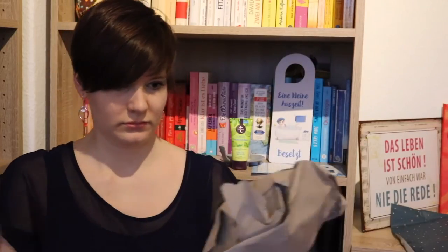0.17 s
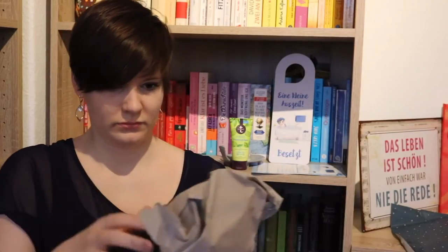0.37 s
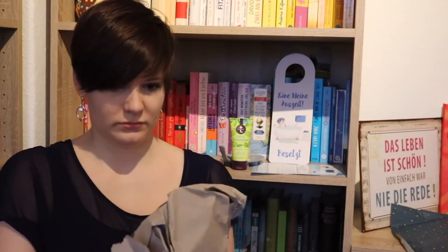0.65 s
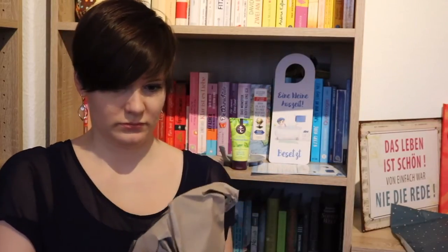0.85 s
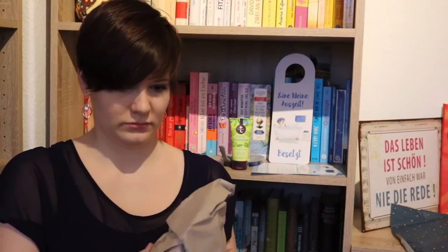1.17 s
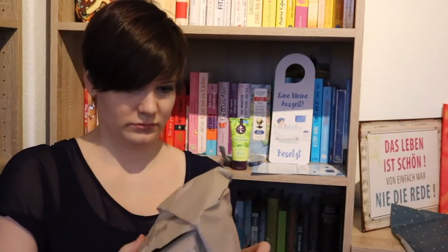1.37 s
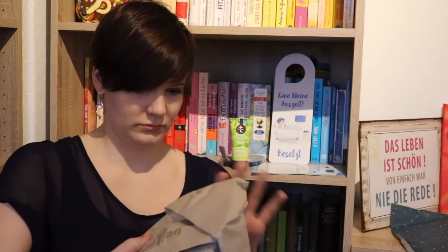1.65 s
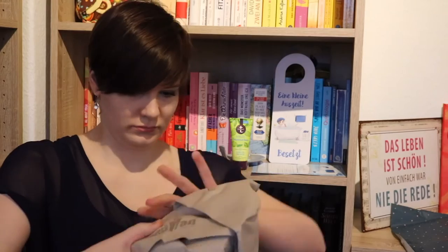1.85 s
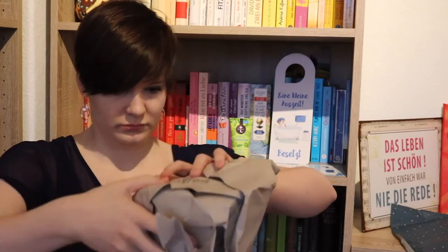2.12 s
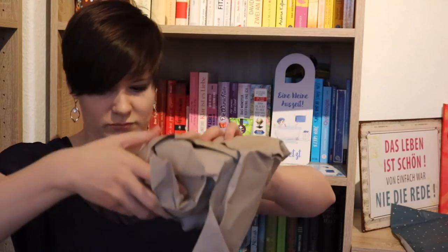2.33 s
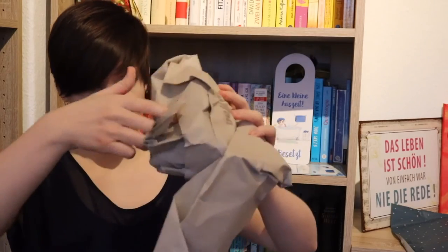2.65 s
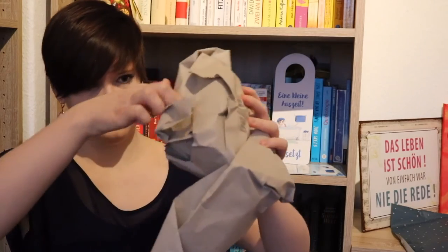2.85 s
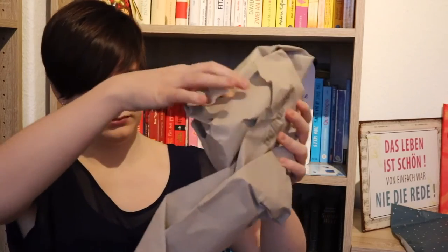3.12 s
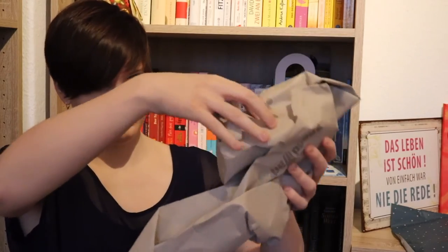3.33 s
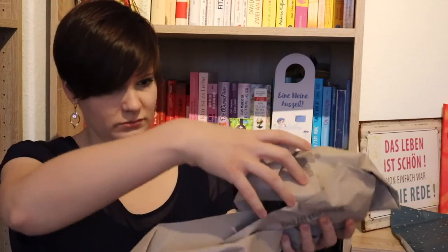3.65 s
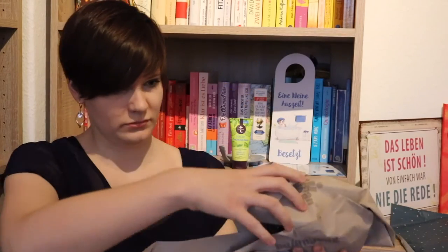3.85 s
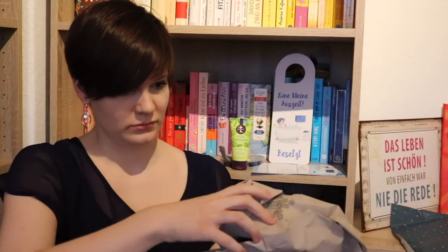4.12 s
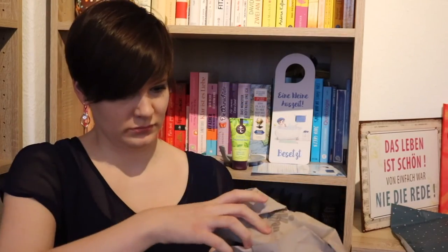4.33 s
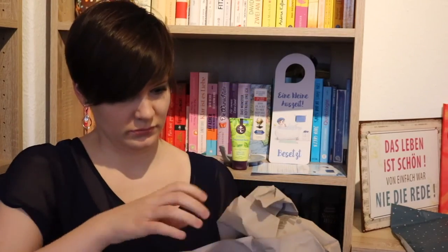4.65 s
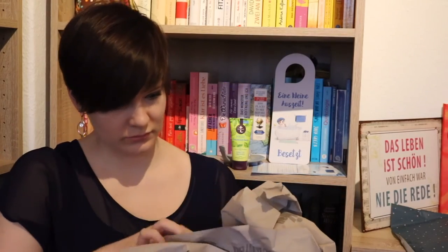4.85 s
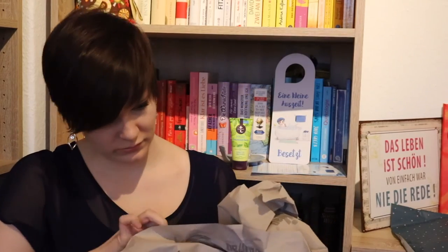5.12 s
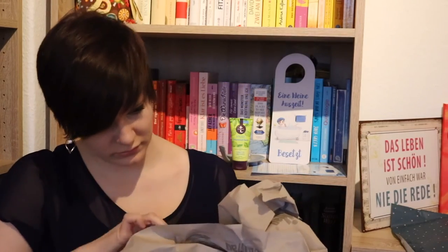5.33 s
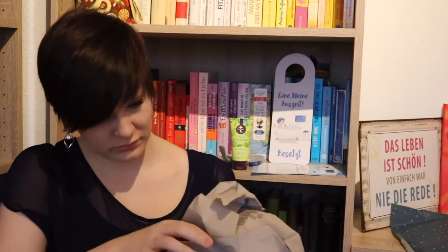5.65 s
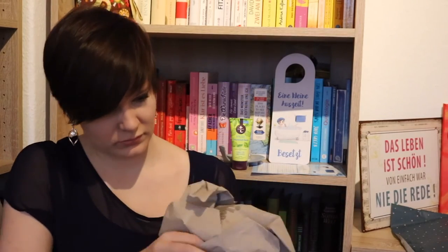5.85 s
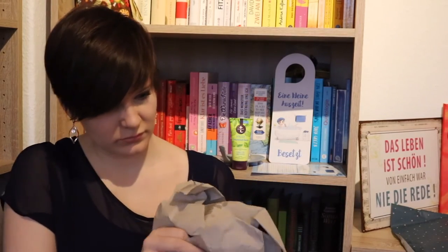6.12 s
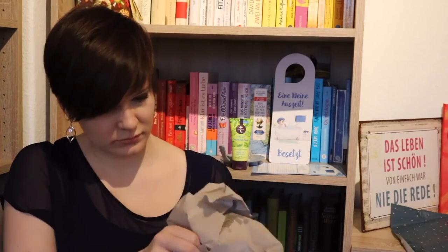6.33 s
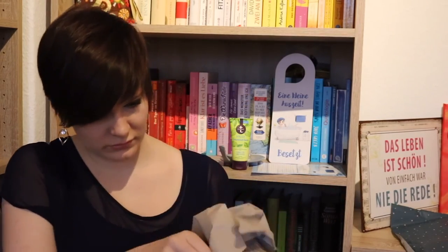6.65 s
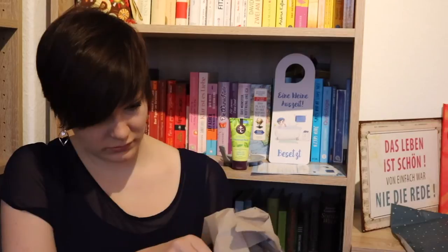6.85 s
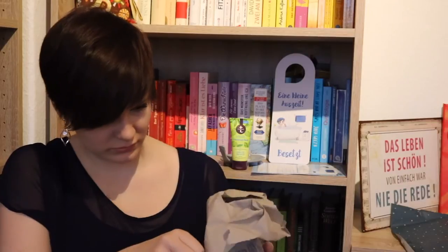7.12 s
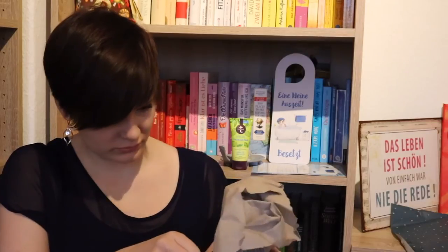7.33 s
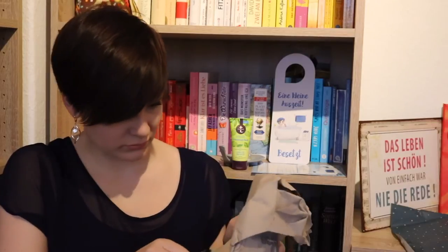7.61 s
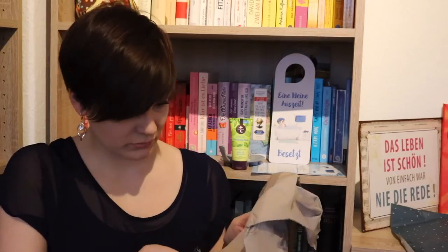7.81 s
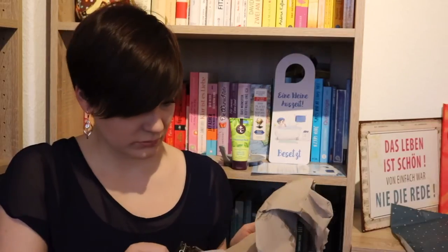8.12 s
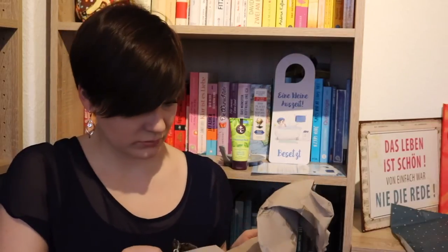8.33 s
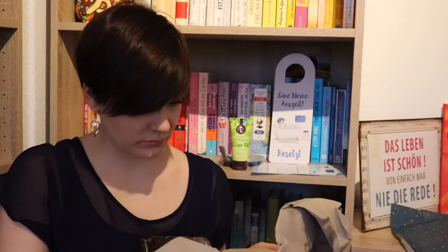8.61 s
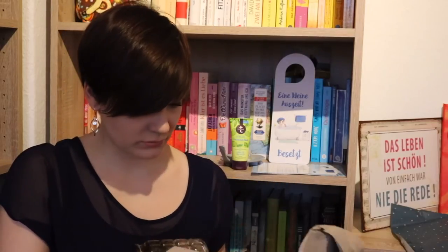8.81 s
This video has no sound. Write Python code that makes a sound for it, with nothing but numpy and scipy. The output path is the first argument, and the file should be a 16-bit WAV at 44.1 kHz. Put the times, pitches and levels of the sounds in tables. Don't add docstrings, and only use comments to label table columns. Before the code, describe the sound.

Stiff brown packing paper crinkles, snaps and rustles in uneven bursts as hands unwrap a bundle close by in a small furnished room.

```python
import sys
import numpy as np
from scipy import signal
from scipy.fft import rfft, irfft, next_fast_len
from scipy.io import wavfile
from scipy.ndimage import uniform_filter1d

SR = 44100
rng = np.random.default_rng(int(sys.argv[2]) if len(sys.argv) > 2 else 0)


def boost_factor(decibels):
    exponent = np.asarray(decibels, float) / 20
    return 10 ** exponent


def master_out(mix):
    frames = np.transpose(np.atleast_2d(mix))
    ceiling = np.clip(frames, -1, 1)
    pcm = np.round(ceiling * 32767).astype(np.int16)
    wavfile.write(sys.argv[1], SR, pcm)


N = 395572
BODY_HZ, CRACKLE_HZ, FIBRE_HZ = 500, 2680, 8100
EDGES = 40 * 2 ** np.arange(0, 8.7, .4)
CENTRES = np.sqrt(EDGES[1:] * EDGES[:-1])


def at_hz(points, hz):
    points = np.array(points)
    return np.interp(np.log(hz), np.log(points[:, 0]), points[:, 1])


def rms_one(x):
    return x / np.sqrt(np.mean(x ** 2) + 1e-20)


def drift(rate_hz):
    r = np.exp(-80 * np.pi * rate_hz / SR)
    slow = signal.lfilter([1], [1, -2 * r, r * r], rng.standard_normal(N // 40 + 2002))
    slow = slow[2000:]
    return np.interp(np.arange(N) / 40, np.arange(len(slow)), rms_one(slow))


def band(x, k):
    return signal.sosfilt(signal.butter(2, EDGES[k:k + 2], "band", fs=SR, output="sos"), x)


# pitch_hz, likeness [0-1]
PORT_LIKENESS = [(60, 0.53), (290, 0.99), (640, 0.75), (1400, 0.37), (3100, 0.034), (12000, 0.14)]


def ears(pair, hz):
    alike = np.clip(at_hz(PORT_LIKENESS, hz), 0, .99)
    mid = np.sqrt((1 + alike) / 2) * pair[0]
    side = np.sqrt((1 - alike) / 2) * pair[1]
    return mid + side * [[1], [-1]]


def ring(x, hz, cycles):
    r, w = boost_factor(-60 * hz / (cycles * SR)), 2 * np.pi * hz / SR
    y = signal.lfilter([1, 0, -1], [1, -2 * r * np.cos(w), r * r], x)
    return y / np.abs(y).max()


def grains(per_s, spread_db, shape):
    sizes = boost_factor(spread_db * np.minimum(rng.exponential(1, shape), 5)) * rng.choice([-1, 1], shape)
    return sizes * (rng.random(shape) < per_s / SR) + 1e-18


def add(out, sound, start_s, left_db):
    at = round(start_s * SR)
    out[:, at:at + sound.shape[1]] += sound[:, :N - at] * boost_factor([[left_db / 2], [-left_db / 2]])


# start_s, hold_s, crackle_db, body_db [re crackle], fibre_db [re crackle]
HAND_GRIPS = [(0.0, 0.061, -31.5, -6, -7.5), (.52, 0.071, -39.5, -44, 0.5), (.58, 0.12, -34.5, -9, 2.5),
              (.9, 0.11, -31.5, -40, -13.5), (.93, 0.088, -63.5, 16, -14), (1.06, 0.13, -50.5, -11.5, 1.5),
              (1.22, 0.19, -35, -14.5, -6.5), (1.42, 0.077, -40, -14.5, -17.5),
              (2.7, 0.11, -38.5, -49, -19), (2.87, 0.14, -52, -29, 3.5), (3.63, 0.12, -48, -17, 0.5),
              (4.215, 0.043, -30.5, -27.5, -16), (4.87, 0.092, -37.5, 0.5, -2.5),
              (4.94, 0.073, -31, -1, -6.5), (5.03, 0.091, -33, -13.5, -11), (5.63, 0.063, -48.5, -3, 9),
              (5.68, .2, -65, 6, -3), (5.71, .11, -41, -15, 7), (6.16, 0.16, -33, -10.5, -5.5),
              (7.0, 0.015, -42, -12.5, -8.5), (7.07, 0.043, -29.5, -22.5, -16),
              (7.35, 0.011, -35.5, -8.5, -6), (7.7, 0.24, -79, 17.5, -11), (7.68, 0.1, -44, -29, -15),
              (8.0, 0.034, -36, -16, -0.5), (8.43, 0.075, -28, -28.5, -29), (8.49, 0.049, -26, -16, -6),
              (8.57, 0.15, -31, -20, -15.5), (8.85, 0.095, -28.5, -16, -7.5)]
# start_s, hold_s, crackle_db, fibre_db [re crackle]
SHEET_SHIFTS = [(.2, 0.0054, -61.5, -3.5), (.28, 0.036, -95, -21), (0.758, 0.031, -36, 1),
                (1.6, 0.093, -55.5, 4.5), (1.679, 0.058, -48, 0), (1.8, 0.025, -53.5, -20),
                (1.919, 0.06, -48.5, -5.5), (2.1, 0.104, -53, -7), (2.24, 0.15, -53, -2.5),
                (2.461, 0.3, -60.5, -0.5), (3.14, 0.15, -56.5, -13.5), (3.4, 0.17, -55.5, -10.5),
                (3.781, 0.13, -42, -39), (3.92, 0.11, -67, -3.5), (4.09, 0.097, -46.5, -10.5),
                (4.32, 0.095, -49.5, -12), (4.441, 0.075, -56, -3), (4.761, 0.074, -45, -4.5),
                (5.15, 0.076, -53.5, -12.5), (5.32, 0.047, -57.5, 4), (5.42, 0.24, -59.5, -16),
                (5.88, 0.14, -51, -4), (6.359, 0.087, -51.5, -26.5), (6.48, 0.034, -57, 0),
                (6.64, 0.027, -42.5, 0), (6.805, 0.11, -53.5, -4.5), (7.44, 0.403, -61.5, 1.5),
                (8.08, 0.051, -51.5, -34), (8.33, 0.029, -60.5, -12)]


def handling():
    at_rest_db, shift_body_db = -78, -9
    rise_db_per_s, fall_db_per_s = 384, 329
    t, power = np.arange(0, N + 64, 64) / SR, boost_factor(2 * at_rest_db)
    shifts = [(s, hold_s, db, shift_body_db, fibre_db) for s, hold_s, db, fibre_db in SHEET_SHIFTS]
    for start_s, hold_s, level_db, body_db, fibre_db in list(HAND_GRIPS) + shifts:
        slack_db = rise_db_per_s * np.maximum(start_s - t, 0)
        slack_db = slack_db + fall_db_per_s * np.maximum(t - start_s - hold_s, 0)
        power = power + boost_factor(2 * (level_db - slack_db + np.array([[0], [body_db], [fibre_db]])))
    return [np.interp(np.arange(N) / SR, t, 10 * np.log10(p)) for p in power]


# pitch_hz, level_db [per Hz]
PAPER_SPECTRUM = [(18, -68), (30, -61.5), (88, -24), (250, -7), (467, 4), (606, 0), (830, 2), (2760, 2),
                  (7260, -11), (10500, -19.5), (15500, -36)]


def crumple(per_s=9000, spread_db=2.6, clump_db=.8, patch_db=2.5):
    crackle_db, body_db, fibre_db = handling()
    clump = drift(41)
    clicks = grains(per_s * boost_factor(2.5 * clump), spread_db, (2, 2, N))
    out, shared = 0, drift(14)
    flat_db = at_hz([(BODY_HZ, -3), (CRACKLE_HZ, -4), (FIBRE_HZ, -16)], CENTRES)
    shape_db = at_hz(PAPER_SPECTRUM, CENTRES) - flat_db
    for k, hz in enumerate(CENTRES):
        place = at_hz([(BODY_HZ, -1), (CRACKLE_HZ, 0), (FIBRE_HZ, 1)], hz)
        end_db = fibre_db if place > 0 else body_db
        level_db = crackle_db + abs(place) * (end_db - crackle_db)
        shared = .3 * shared + .95 * drift(5)
        own = np.roll(clicks[k % 2], rng.integers(0, 500), axis=1)
        width_db = 10 * np.log10(hz / CRACKLE_HZ)
        width_db = width_db - at_hz([(BODY_HZ, -8), (CRACKLE_HZ, 0), (FIBRE_HZ, 4)], hz)
        gain = boost_factor(level_db + shape_db[k] + width_db - 11.5 + clump_db * clump + patch_db * shared)
        out = out + gain * ears(rms_one(band(own, k)), hz)
    return out


# pitch_hz, level_db [per Hz]
HISS_SPECTRUM = [(24, -56.5), (40, -2.5), (364, 13.5), (527, -36.5), (1000, -6), (1140, -2), (1260, -22),
                 (15000, -0.5)]


def hiss(level_db=-74):
    size = next_fast_len(N)
    colour = boost_factor(at_hz(HISS_SPECTRUM, np.arange(1, size // 2 + 2) * SR / size))
    noise = irfft(rfft(rng.standard_normal((2, size))) * colour, size)[:, :N]
    return boost_factor(level_db) * rms_one(noise)


# pitch_hz, t60_s
ROOM_DECAY = [(150, 0.21), (600, 0.18), (1400, 0.27), (3700, 0.14), (10000, 0.16)]


def room(x, gap_s=0.0028, onset_s=0.00047, count=3):
    t, size = np.arange(SR // 2) / SR, next_fast_len(N + SR // 2)
    white, out = rng.standard_normal((2, 2, len(t))), 0
    place = np.arange(N) // 5000 % count
    for p in range(count):
        own = np.roll(white, p * len(t) // count, axis=2) * np.clip((t - gap_s) / onset_s, 0, 1)
        echo = 0
        for k, hz in enumerate(CENTRES):
            echo = echo + ears(band(own[k % 2], k), hz) * boost_factor(-60 * t / at_hz(ROOM_DECAY, hz))
        here = uniform_filter1d(1. * (place == p), size=1000) * x.mean(axis=0)
        out = out + rfft(here, size) * rfft(echo, size) / np.sqrt(np.sum(echo ** 2) / 2)
    return irfft(out, size)[:, :N]


def snap(out, start_s, peak_db, hz, large_db, thump_db, tick_db):
    length, after_s, after_db, rise_s = 2048, 0.0047, -13, .0006
    t = np.arange(length) / SR
    shocks = grains(2000, 4.0, (3, length)) * np.exp(-t / after_s) * boost_factor(after_db)
    shocks[:, 0] = 1, .4, -.4
    pitch, side = boost_factor(rng.normal(0, 1.0, 3)), rng.normal(0, 1)
    small = ring(shocks[0], hz, 10.7)
    small = small - boost_factor(-6.5) * ring(shocks[0], 1.486 * hz * pitch[0], 10.0)
    small = small + boost_factor(-14) * ring(shocks[0], 1.9 * hz, 20.0)
    small = ring(ring(small, 1.66 * hz, 0.62), 0.75 * hz, 1.2)
    large = ring(ring(ring(shocks[0], 1350 * pitch[1], 1.16), 1300, 3.03), 1300, 3.03)
    thump = ring(ring(shocks[0], 600 * pitch[2] ** .5, 8), 420, 2.5)
    tick = ring(ring(shocks[1:], 9300, 3.1), 6060, 6.1)
    sound = small + boost_factor(large_db + 7.0) * large + boost_factor(thump_db + 6.0) * thump + boost_factor(tick_db + 9.5) * tick
    add(out, boost_factor(peak_db - 4.0) * sound, start_s + rise_s, -1.5 + 2.0 * side)


# start_s, peak_db [small facet], pitch_hz, large_db [re small]
SHARP_CREASES = [(0.05, -9.5, 3770, -42), (0.496, -21.5, 1950, -24), (2.298, -22, 2460, -13.5),
                 (2.5954, -11.5, 2270, -18), (2.728, -16, 2580, -14.5), (2.7847, -19, 3300, -38),
                 (2.884, -14, 2850, -28.5), (3.6592, -22, 2930, -18.5), (3.825, -15, 1700, -6.5),
                 (4.9389, -9, 2290, -13.5), (5.3286, -31, 4200, -36), (6.2132, -15.5, 2930, -27),
                 (1.262, -22.5, 3000, -13), (6.2489, -8, 2600, -34), (6.2678, -5.5, 3750, -14),
                 (7.11, -15, 3420, -11), (7.289, -14.5, 1930, -14), (7.9392, -29, 2500, -11),
                 (7.969, -25, 3050, -39.5), (7.9874, -8.5, 2730, -53), (8.12, -23, 2910, -42),
                 (8.49, -15.5, 2750, -5.5), (8.6797, -20, 3300, -19)]


def sharp_creases():
    out = np.zeros((2, N))
    for start_s, peak_db, hz, large_db in SHARP_CREASES:
        snap(out, start_s, peak_db, hz, large_db, thump_db=large_db - 11, tick_db=-10.5)
    return out


# start_s, peak_db, pitch_hz, ring_cycles
BARE_CRACKS = [(1.9092, -37, 1490, 4.7), (1.995, -38, 603, 4.5), (2.279, -19, 3000, 1.3),
               (2.308, -19, 4520, 2.7), (2.358, -41.5, 500, 11), (3.3268, -30, 4300, 3.6),
               (3.824, -23, 4200, 3.0), (3.83, -16, 2650, 2.2), (4.211, -18, 3000, 2),
               (4.9393, -10.5, 2500, 3.3), (5.4925, -33.5, 1020, 18), (6.2513, -13, 3160, 2.8),
               (7.1125, -11.5, 3940, 8.8), (7.288, -28, 4030, 2.2), (7.6849, -12, 3330, 4.5),
               (7.988, -10, 6900, 6.5), (8.6806, -14.5, 3590, 6.9), (.95, -41, 414, 16),
               (1.0, -29.5, 405, 5.9), (3.03, -43.5, 460, 1.8), (7.699, -47, 262, 5), (0.275, -60, 447, 16),
               (.275, -59, 850, 9.2), (0.8947, -35, 1920, 5.9), (2.618, -10, 5800, 4),
               (2.7856, -21, 7300, 5.6), (2.8869, -19, 5530, 5.7), (2.887, -30.5, 1360, 36),
               (4.9395, -18.5, 730, 5.3), (4.9392, -23, 5000, 3.6), (5.0366, -19, 2580, 2.5),
               (5.129, -34, 2720, 8.8), (7.785, -29.5, 7260, 4.1), (7.784, -40, 4200, 3),
               (8.7932, -26, 3780, 5), (8.8543, -20, 2080, 2.2), (7.383, -29.5, 460, 2.4),
               (6.2135, -15.5, 5200, 4), (6.228, -15, 5600, 3.5), (3.193, -35, 2620, 9.6),
               (4.974, -20, 3400, 4)]


def bare_cracks(length=2048):
    out, click = np.zeros((2, N)), signal.unit_impulse(length) * np.ones((2, 1))
    for start_s, peak_db, hz, cycles in BARE_CRACKS:
        sound = ring(ring(click, hz, np.clip(cycles, 1.5, 20)), hz, 5.6)
        add(out, boost_factor(peak_db) * sound, start_s, -2.5)
    return out


# start_s, peak_db [small facet], pitch_hz, large_db [re small], tick_db [re small]
WIDE_PANELS = [(0.419, -45, 2570, -5, -25), (0.465, -29.5, 2260, -8, -11.5), (0.7404, -20.5, 2620, -5, 1),
               (0.889, -41, 2860, -13.5, -9), (0.9595, -19.5, 1970, -1, -24), (0.965, -31, 1560, -10, -27),
               (1.0114, -15, 2150, -6, -40), (1.2898, -17, 3700, -5.5, -5.5),
               (1.9092, -27, 2380, -3.5, -20), (3.1327, -28.5, 2650, -1, -12), (3.192, -41, 2670, -7, -24),
               (3.3227, -6, 2430, -10, -39.5), (4.0752, -31.5, 2640, 0.5, -9), (4.209, -15, 2300, -11, -11),
               (4.462, -36, 2380, -9, -9), (4.723, -33.5, 2380, 2.5, -7.5), (4.7471, -21.5, 1920, -6, -12),
               (5.035, -14, 2300, -7, -9.5), (5.4917, -29.5, 2250, -4.5, -28),
               (6.526, -33.5, 2210, -3.5, -27), (6.601, -21, 2000, -23, -7), (7.0491, -18.5, 1670, 0, -44),
               (8.446, -29.5, 2160, 8.5, -28)]


def wide_panels():
    out = np.zeros((2, N))
    for start_s, peak_db, hz, large_db, tick_db in WIDE_PANELS:
        snap(out, start_s, peak_db, hz, large_db, thump_db=-18.5, tick_db=tick_db)
    return out


# start_s, peak_db, pitch_hz, push_db [low push re pocket]
FINGER_KNOCKS = [(0.422, -42, 1040, -42), (0.486, -51.5, 308, -9), (1.752, -43, 610, -39),
                 (1.777, -40, 600, -46), (2.189, -55, 606, -3), (2.36, -46.5, 370, -11),
                 (2.596, -51.5, 282, -11), (2.729, -34, 560, -21), (2.798, -39, 590, -18),
                 (3.661, -39.5, 420, -16), (3.761, -40.5, 500, -22), (4.081, -47, 370, -12),
                 (5.373, -39.5, 367, -23), (5.396, -46, 600, -23), (5.49, -35, 560, -28.5),
                 (6.138, -50, 473, -9), (6.641, -34, 780, -27), (7.118, -30.5, 422, -26),
                 (7.371, -32.5, 444, -38), (8.119, -37.5, 1070, -57.5), (8.68, -23, 630, -33.5),
                 (8.709, -28.5, 610, -29)]


def knocks(length=4096):
    out, t = np.zeros((2, N)), np.arange(length) / SR
    for start_s, peak_db, hz, push_db in FINGER_KNOCKS:
        shocks = grains(600, 1.7, length) * np.exp(-t / 0.0067) * boost_factor(-7.0)
        shocks[0] = 1
        pocket = ring(ring(shocks, hz, 7.2), hz, 5.6)
        push = ring(ring(shocks, 254, 16.5), 154, 7.5)
        sound = pocket + boost_factor(push_db + 7.5) * push
        add(out, boost_factor(peak_db + 3.0) * sound * np.ones((2, 1)), start_s, -.5)
    return out


# start_s, peak_db, run_s, bright_db [re facets], pitch_hz [middle facet]
TEARING_RUNS = [(0.462, -24.5, 0.13, -21, 2820), (0.5503, -17, 0.018, -2, 2940),
                (0.578, -17.5, 0.0089, -4, 3540), (0.74, -32, 0.018, 7.5, 2800),
                (1.179, -22, 0.034, -12, 3500), (1.234, -35, .03, -20, 2020), (1.9076, -51, 0.021, 0, 2800),
                (2.539, -25.5, 0.053, -2, 2400), (2.596, -13, 0.062, -42, 2380),
                (2.7807, -22.5, 0.045, -3, 3400), (2.875, -59, .04, 32, 3400),
                (3.322, -27.5, 0.053, -15.5, 2200), (3.618, -42, 0.23, 10.5, 3070),
                (3.823, -11.5, 0.039, -30.5, 2380), (4.077, -25.5, 0.0051, -3.5, 2630),
                (4.719, -29, 0.047, -3, 2530), (4.881, -25, 0.059, -15.5, 3400),
                (4.896, -13, 0.012, -7, 2480), (5.637, -19.5, 0.039, -6.5, 2840),
                (5.893, -18.5, 0.052, -11.5, 2760), (6.139, -14, 0.026, -6, 2840),
                (6.601, -11.5, 0.022, -39, 1960), (7.054, -23, 0.0084, -34, 2600),
                (7.2877, -16.5, 0.05, -5.5, 2340), (8.4067, -47, 0.033, -26, 2720),
                (8.8357, -31.5, 0.15, -25, 2800)]


def runs(length=10240, per_s=2500, spread_db=3.0):
    out, t = np.zeros((2, N)), np.arange(length) / SR
    for start_s, peak_db, run_s, bright_db, facet_hz in TEARING_RUNS:
        mid, side = grains(per_s, spread_db, (2, length)) * np.exp(-t / np.clip(run_s, .005, .12))
        shocks = mid + 0.82 * side * [[1], [-1]]
        facets_hz = facet_hz * np.array([.55, 1, 1.65]) * boost_factor(rng.normal(0, .3, 3))
        facets = sum(ring(shocks, hz, 11) for hz in facets_hz)
        bright = ring(ring(shocks, 5900, 3.0), 9100, 1.1)
        sound = ring(facets, 3300, 1.12) + boost_factor(bright_db) * bright
        add(out, boost_factor(peak_db - 3.5) * sound, start_s, -1.5)
    return out


# start_s, drag_s, peak_db, pitch_hz, glide_per_s
FINGER_DRAGS = [(.9, 0.04, -46, 3340, 0.15), (.63, 0.063, -35, 2580, 0), (1.03, 0.057, -29.5, 960, 0.19),
                (1.23, 0.095, -28, 720, -0.25), (1.831, 0.047, -45, 3700, .3),
                (3.33, .11, -31.5, 1750, -0.045), (3.84, 0.059, -26.5, 4130, -0.12),
                (3.841, 0.066, -24.5, 1840, 0.041), (4.11, 0.05, -36, 2850, 0.58),
                (4.241, 0.11, -33, 1670, -0.082), (4.22, 0.062, -31.5, 4940, -0.069),
                (4.73, 0.089, -32.5, 2680, -0.47), (4.82, 0.05, -35, 1600, -0.063),
                (5.119, 0.087, -32, 2730, 0.069), (5.11, 0.085, -31, 670, 0.11),
                (5.606, 0.07, -30, 2940, -0.033), (5.691, .07, -36, 2970, 0.094),
                (5.63, 0.18, -31.5, 540, -0.011), (5.72, 0.26, -45, 576, 0), (5.775, 0.054, -30, 1480, 0.2),
                (5.93, 0.074, -33.5, 4500, -0.22), (6.801, 0.11, -39.5, 4070, 0.34),
                (7.481, 0.68, -38, 1310, 0.31), (7.483, 0.066, -34, 2920, -0.68),
                (7.485, 0.054, -33, 4960, -0.37), (7.549, 0.2, -40.5, 3170, 0.34),
                (7.58, 0.085, -47, 4600, 0.085), (7.57, .1, -43, 5340, 0.58),
                (7.54, 0.073, -39.5, 2460, 0.12), (7.609, 0.061, -43, 7700, 0),
                (7.719, 0.063, -39.5, 2800, -0.52), (7.721, 0.1, -34, 1510, 0.28),
                (7.76, 0.056, -32.5, 1060, -0.13), (8.33, 0.14, -57, 2680, 0.25),
                (8.69, .13, -30.5, 624, -0.04)]


def drags(length=12288, per_s=1200, cycles=28.0):
    out, i = np.zeros((2, N)), np.arange(length)
    for start_s, drag_s, peak_db, hz, glide in FINGER_DRAGS:
        stroke = np.clip(1 - (2 * i / SR / drag_s - 1) ** 2, 0, 1)
        slips = grains(per_s, 3, (2, length)) * stroke
        sound = ring(ring(ears(slips, hz), hz, cycles * (hz / CRACKLE_HZ) ** 1.3), hz, 4.4)
        warped = i * (1 + glide * i / SR)
        sound = np.array([np.interp(warped, i, ear, right=0) for ear in sound])
        add(out, boost_factor(peak_db) * sound, start_s, -1.5)
    return out


# start_s, peak_db, pitch_hz, ring_cycles
FACET_PINGS = [(0.8564, -32, 1330, 23), (1.1283, -31, 2230, 12), (1.587, -30.5, 2560, 24),
               (1.884, -41, 3700, 15), (2.359, -34, 1730, 8.1), (2.498, -44, 3100, 17),
               (3.028, -28.5, 3180, 2.5), (3.232, -42, 1170, 11), (3.484, -41, 1440, 19),
               (3.761, -22.5, 2970, 13), (4.35, -27.5, 2880, 23), (4.729, -17.5, 1460, 13),
               (5.3128, -56, 3640, 12), (5.345, -38, 2870, 16), (6.116, -43, 2820, 13),
               (1.695, -26, 4770, 8.9), (6.8423, -33.5, 3940, 21), (6.8665, -22.5, 2670, 21),
               (7.4629, -32, 1380, 10), (7.4847, -24.5, 2800, 14), (7.667, -23.5, 1400, 4.6),
               (7.7825, -22, 2300, 17), (7.8967, -37.5, 2420, 10.6), (8.383, -36.5, 2700, 17)]


def pings(length=2048):
    out, t = np.zeros((2, N)), np.arange(length) / SR
    for start_s, peak_db, hz, cycles in FACET_PINGS:
        shocks = grains(1500, 5.5, length) * np.exp(-t / 0.0014) * boost_factor(-5.0)
        shocks[0] = 1
        sound = ring(ring(shocks, hz, np.clip(cycles, 3, 40)), hz, 5)
        add(out, boost_factor(peak_db - 1.5) * sound * np.ones((2, 1)), start_s, -2.5)
    return out


# start_s, peak_db [small facet], pitch_hz, thump_db [re small]
SMALL_DENTS = [(1.396, -23, 3650, -12), (1.676, -20.5, 3000, -52), (2.099, -26.5, 3240, -26),
               (2.1899, -23.5, 2820, -8.5), (2.262, -18, 3700, -17.5), (2.6144, -13, 3740, -26.5),
               (2.644, -15.5, 2450, -22), (4.1709, -20, 2670, -22), (5.894, -17, 2330, -23.5),
               (6.142, -19, 2500, -23), (6.3973, -21.5, 3800, -53), (6.6414, -17, 2110, -18.5),
               (6.969, -38, 2940, -19), (7.6858, -14.5, 2940, -55), (8.082, -20.5, 3630, -39),
               (8.32, -34.5, 2740, -39), (8.4794, -11, 2520, -27), (8.8343, -12.5, 2810, -24)]


def dents():
    out = np.zeros((2, N))
    for start_s, peak_db, hz, thump_db in SMALL_DENTS:
        snap(out, start_s, peak_db, hz, large_db=-18.5, thump_db=thump_db, tick_db=-29)
    return out


def scene():
    rustle, bare, hollow, narrow = crumple(), bare_cracks(), knocks(), pings()
    cracks = sharp_creases() + wide_panels() + dents()
    torn = runs() + drags()
    sent = boost_factor(-1.5) * cracks + boost_factor(-2.0) * hollow + boost_factor(-4.0) * narrow + boost_factor(-5.0) * bare
    sent = sent + boost_factor(-10.0) * torn + boost_factor(-15.0) * rustle
    return cracks + hollow + narrow + bare + torn + rustle + room(sent) + hiss()


def roll_off(x):
    return signal.sosfilt(signal.butter(12, 15870, fs=SR, output="sos"), x)


# pitch_hz, left_re_right_db
PORT_TILT = [(1300, 0.5), (2400, -2.5), (4400, -1.5), (8100, 2), (15000, 5)]


def record(dry, knee_db=-82, ratio=0.21, depth_db=-14, top_hz=15700, flutter_db=2.5):
    hz, _, cells = signal.stft(dry, SR, nperseg=512, noverlap=384)
    hz = np.maximum(hz, 40)[:, None]
    power = np.mean(np.abs(cells) ** 2, axis=0)
    power = uniform_filter1d(uniform_filter1d(power, size=5, axis=0), size=5, axis=1)
    above_db = 10 * np.log10(np.abs(power) + 1e-16) - knee_db - 1.1 * at_hz(PAPER_SPECTRUM, hz)
    gate_db = np.clip(ratio * above_db, depth_db, 0)
    flutter = uniform_filter1d(rng.standard_normal(power.shape), size=2, axis=0)
    flutter = rms_one(uniform_filter1d(flutter, size=12, axis=1))
    gate_db = gate_db + flutter_db * flutter * at_hz([(600, 0.98), (9000, 1.12)], hz)
    tilt_db = at_hz(PORT_TILT, hz) / 2 * np.array([1, -1])[:, None, None]
    x = signal.istft(cells * boost_factor(gate_db + tilt_db), SR, nperseg=512, noverlap=384)[1][:, :N]
    x = signal.sosfilt(signal.butter(8, top_hz, fs=SR, output="sos"), x)
    return roll_off(x)


dry = scene()
out = record(dry)
master_out(out)
```